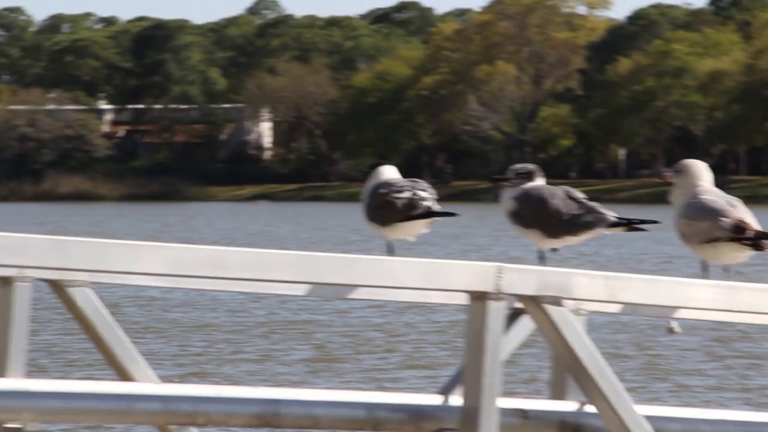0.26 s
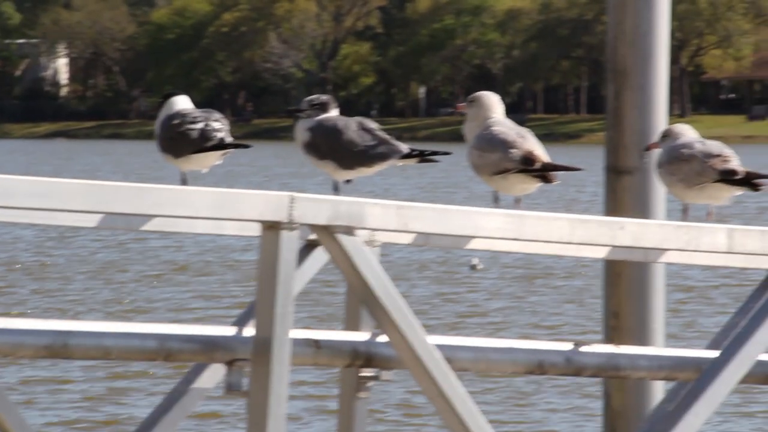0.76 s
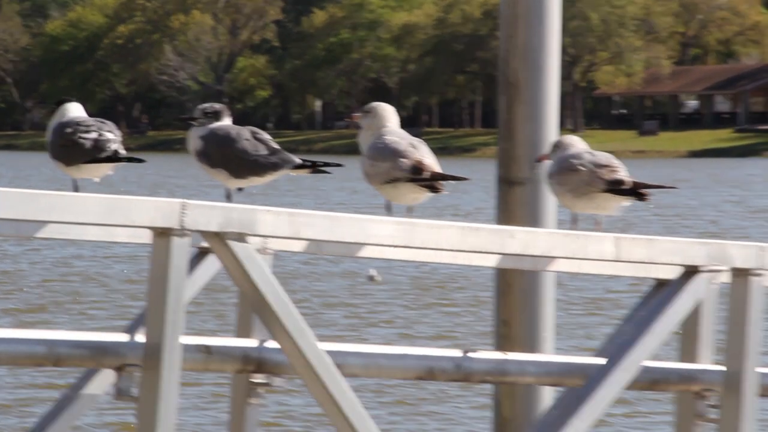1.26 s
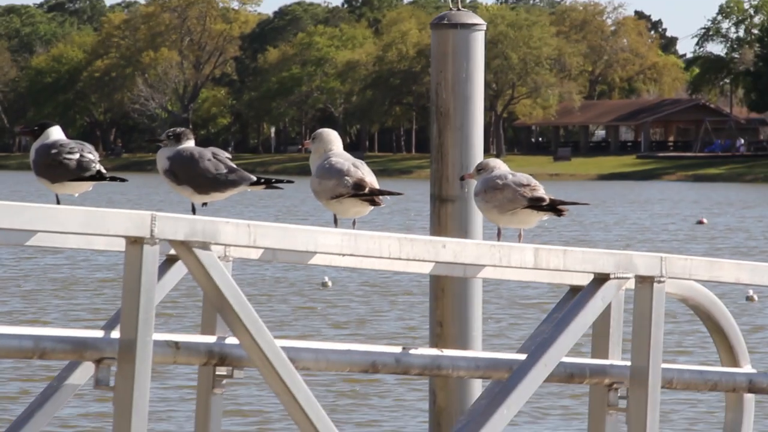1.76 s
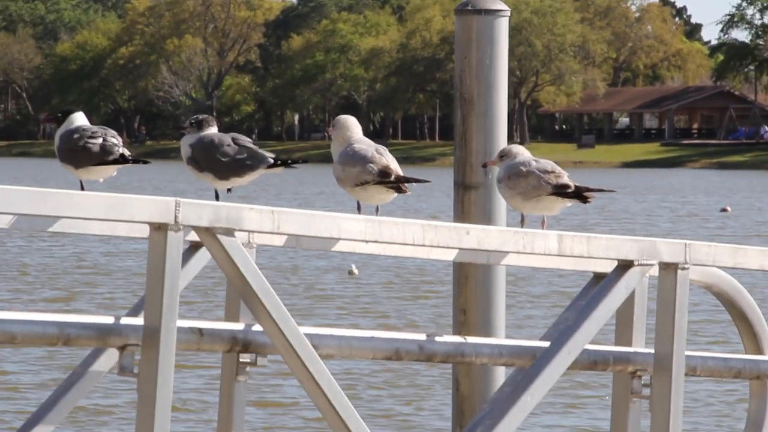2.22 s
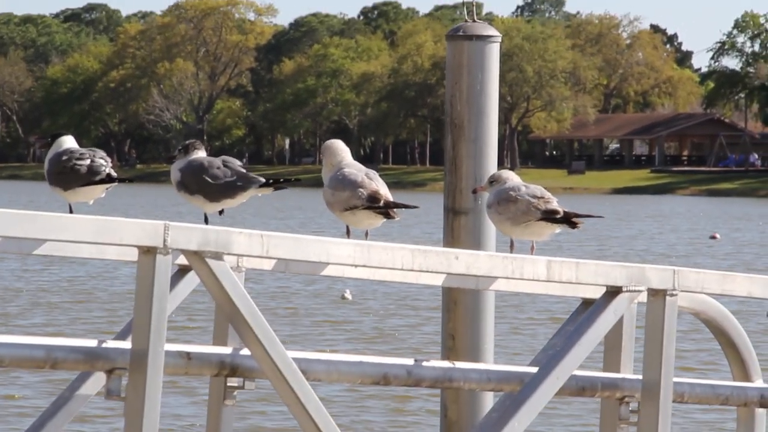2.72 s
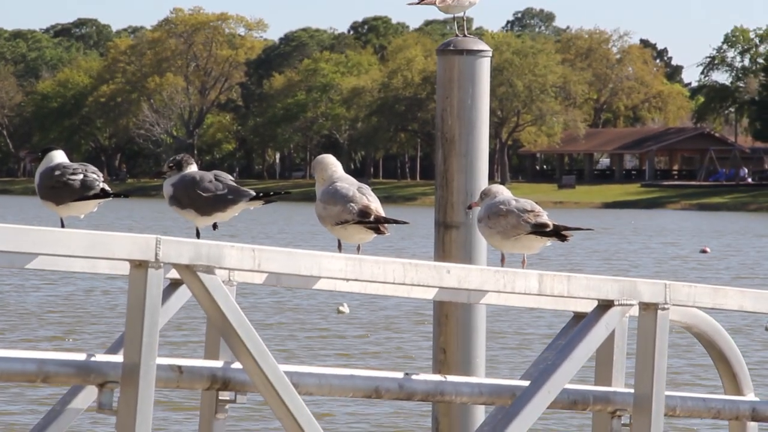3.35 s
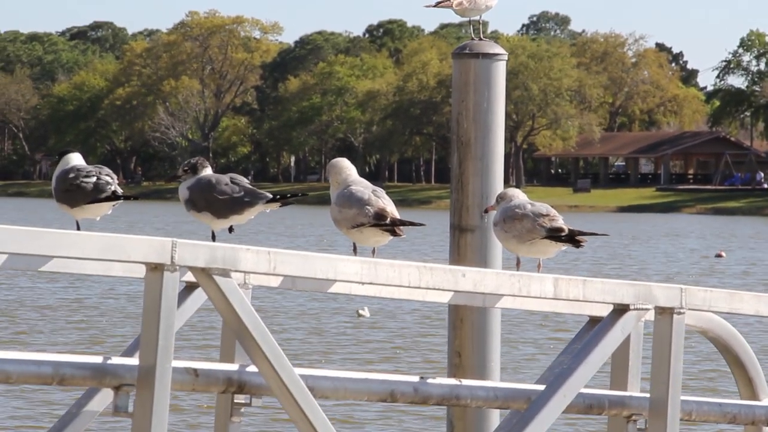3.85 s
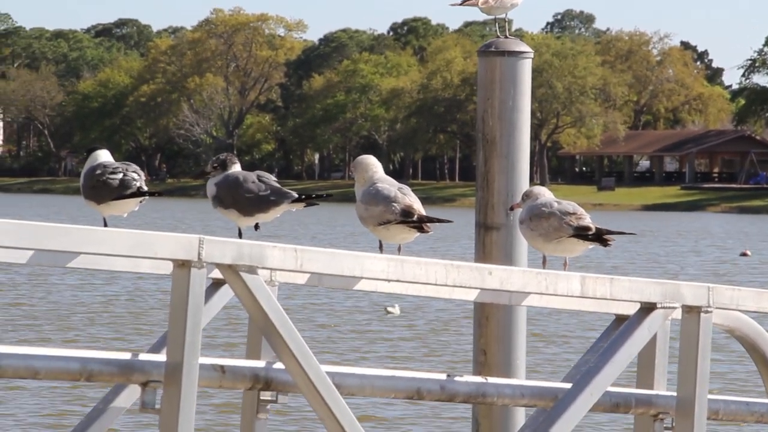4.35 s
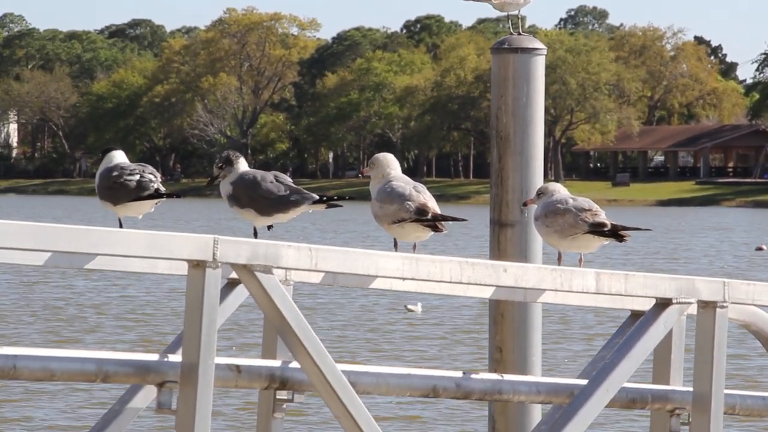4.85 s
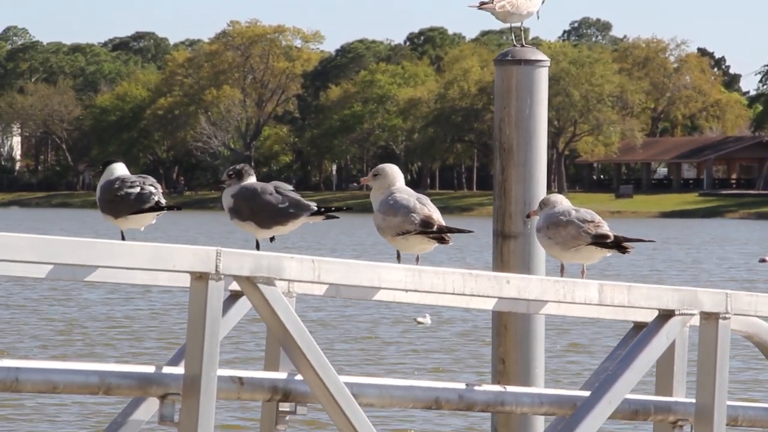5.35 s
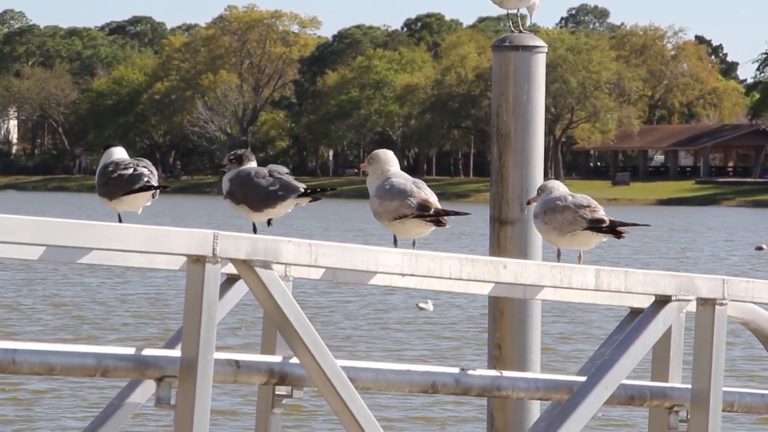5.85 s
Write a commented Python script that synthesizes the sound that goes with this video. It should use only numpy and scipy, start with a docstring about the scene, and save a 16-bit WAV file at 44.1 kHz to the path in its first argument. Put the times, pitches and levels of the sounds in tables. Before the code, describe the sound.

Low wind rumbles and buffets the microphone throughout, over a steady wash of lake water and distant shore. In the first 0.7 seconds a gull gives a thin squeak, followed by a nasal yelp and a faint wail. A zoom lens whirs quietly until about 1.4 seconds, with soft hand rubs and ticks on the housing. Faint peeps come near 2.8 seconds, then a small cluster of ticks around 3 seconds. From 3.7 to 4.9 seconds a close gull on the left gives six short, shrill, falling cries, the most prominent sounds, each with a slight echo. Softer low yelps and high squeaks fall among them. From 4.8 seconds four sagging peeps come from farther off to the right, while harder gusts hit that side. A faint mew and a brief wail close things at about 6 seconds.

```python
"""A metal dock by a lake, with gulls calling in a light wind, heard through a small stereo microphone.
A near gull on the left gives six sharp falling cries; others squeak, peep, yelp, mew and wail around it.
Each call is a gliding harmonic tone shaped by the throat and thrown back by dock and shore.
Wind buffets the microphone, a hand rubs and ticks on its housing, a zoom lens whirrs,
and the far shore and the water lay a steady wash underneath."""
import sys
import numpy as np
from scipy import signal
from scipy.fft import rfft, irfft, next_fast_len
from scipy.io import wavfile

SR = 44100
rng = np.random.default_rng(int(sys.argv[2]) if len(sys.argv) > 2 else 0)


def master(y):
    """Save y as 16-bit WAV."""
    cut = np.clip(np.atleast_2d(y).T, -1, 1)
    pcm = np.round(cut * 32767)  # scale
    wavfile.write(sys.argv[1], SR, pcm.astype(np.int16))


N = 268172
TIME = np.arange(N) / SR
FFT_SIZE = next_fast_len(N, real=True)
FFT_HZ = np.fft.rfftfreq(FFT_SIZE, 1 / SR)
TOP_HZ = 15900


# Cues: start_s, length_s, pitch_hz, glide_depth, level_db, balance_db, mouth_ratio, jitter_ratio
# Positive balance is left; the mouth ratio scales the throat's resonant frequencies.
CRY_CUES = [(3.677, 0.062, 3488, 0.81, -14, 14, 0.94, 0.011),
            (3.891, 0.065, 3446, 1.06, -14, 12.5, 1, .005),
            (4.113, 0.056, 3487, 0.93, -18, 10.5, 1, 0.0084),
            (4.389, 0.063, 3360, 1.06, -12.5, 12.5, 1, 0.0066),
            (4.631, .067, 3372, 1.08, -13, 12.5, 0.99, 0.0066),
            (4.846, 0.063, 3370, 0.92, -15, 13, 1, 0.02)]
# Contour of one call: length_fraction, pitch_ratio, level_db
CRY_CONTOUR = [(0, .95, -10), (.06, 1.125, -21.5), (.2, 1.09, -11.5), (.35, 1.035, -4), (.5, 1, -4.5),
               (.65, .975, 1), (.8, .955, 1), (.91, 0.955, -0.5), (1, 0.823, -25)]
# Throat resonances: frequency_hz, gain_db
CRY_FORMANTS = [(2500, -5), (3600, 0), (5200, 20.5), (6400, -14.5), (7300, -12), (9000, -25), (10500, -28),
                (14000, -46)]
def cries():
    """The lead gull: shrill, falling cries, close on the left."""
    return gull_calls(CRY_CUES, CRY_CONTOUR, CRY_FORMANTS, rasp_hz=8500,
                      bounce_s=.008, bounce_db=-18, wet_db=-17, left_lead_s=.00025)


# Cues, contour and throat of the squeaks; columns as for the cries
SQUEAK_CUES = [(.077, 0.058, 5190, 1.2, -28, 2.7, 0.62, .005),
               (3.951, 0.053, 5250, 1.1, -31, 3, 0.62, .006),
               (4.222, .064, 5060, 1.2, -27, 1, 0.91, 0.0088),
               (5.039, 0.055, 5250, 0.87, -31, 3, 0.86, 0.029)]
SQUEAK_CONTOUR = [(0, .55, -15), (.13, 1.04, -3), (.3, 1.01, 0), (.5, .985, -3), (.68, .93, 0),
                  (.85, .85, -2), (1, .68, -12)]
SQUEAK_FORMANTS = [(3000, 13), (5200, -7), (8000, 0), (11000, -30), (15000, -40)]
def squeaks():
    """Thin squeaks that flick up and drop away."""
    return gull_calls(SQUEAK_CUES, SQUEAK_CONTOUR, SQUEAK_FORMANTS, rasp_hz=8500,
                      bounce_s=.013, bounce_db=-12, wet_db=-12, left_lead_s=.00005)


# Cues, contour and throat of the peeps; columns as for the cries
PEEP_CUES = [(2.838, 0.074, 3770, .6, -36, 17, 1.8, 0.03), (2.9, 0.126, 3640, 0.19, -46.5, 5, 1.1, 0.062),
             (4.800, 0.057, 2700, 0.96, -30, -8, 1.1, 0.012),
             (5.161, 0.068, 2640, 1.14, -31.5, -10, 1.28, 0.017),
             (5.549, .078, 2620, 1.1, -29.5, -7, 1.17, 0.013),
             (5.872, 0.067, 2580, 1.2, -26.5, -8, 0.65, 0.017)]
PEEP_CONTOUR = [(0, 1.11, -14), (.2, 1.06, -10), (.5, 1.005, -3), (.7, .985, 0), (.88, .96, -2),
                (1, .92, -16)]
PEEP_FORMANTS = [(2500, 11), (3800, -9), (5200, -19), (7600, -31), (9000, -32), (15000, -50)]
def peeps():
    """Sagging peeps from farther along the dock, with a strong bounce."""
    return gull_calls(PEEP_CUES, PEEP_CONTOUR, PEEP_FORMANTS, rasp_hz=5500,
                      bounce_s=.014, bounce_db=-4, wet_db=-14)


# Cues, contour and throat of the yelps; columns as for the cries
YELP_CUES = [(.268, 0.11, 565.7, 1.07, -25, 7, 0.94, 0.0086),
             (3.655, 0.084, 557, 0.78, -30, 5, 0.93, 0.016),
             (3.70, 0.085, 576, .4, -32.5, 6.9, 0.92, 0.0087),
             (4.21, .1, 472.4, 0.64, -34.5, 2, 0.712, 0.0054), (4.41, 0.11, 417, .5, -41.5, 2, 0.795, .006)]
YELP_CONTOUR = [(0, .66, -18), (.2, .9, -7), (.32, .98, -2), (.43, 1, -1), (.6, .945, 0), (.78, .83, -8),
                (1, .68, -15)]
YELP_FORMANTS = [(400, -23), (1100, -13), (1620, 3.5), (1850, -5), (2150, 2), (2300, 5), (2600, -10.5),
                 (3500, -19), (4800, -17), (7000, -16), (8000, -28), (14000, -52)]
def yelps():
    """Low, nasal yelps that arch in pitch."""
    return gull_calls(YELP_CUES, YELP_CONTOUR, YELP_FORMANTS, rasp_hz=4800,
                      bounce_s=.025, bounce_db=-16, wet_db=-11)


# Cues and contours of the mew and the wails, and their shared throat; columns as for the cries
MEW_CUES = [(5.74, 0.16, 1000, 1.05, -43, 2, 1.19, 0.022)]
MEW_CONTOUR = [(0, .985, -10), (.2, 1.005, -2), (.5, 1, 0), (.8, .98, -1), (1, .94, -8)]
WAIL_CUES = [(.355, .325, 575, 1.41, -45, 6.9, 0.98, .004), (5.925, .2, 648, 1, -33.5, 7.9, 0.94, 0.0044)]
WAIL_CONTOUR = [(0, .6, -6), (.16, 1, -1), (.34, .98, -1), (.49, .68, -5), (.6, .672, -2), (.78, .658, 2),
                (.9, .652, 0), (1, .57, -8)]
MEW_FORMANTS = [(400, -30), (1000, -18), (1300, -7), (1680, 0), (1950, -4), (2200, -9), (2500, -1),
                (2700, -18), (3350, -12), (4000, -26), (9000, -42)]
def mew_and_wails():
    """One voice: a level, drawn-out mew, and wails that break from high to a low held note."""
    voice = dict(formants=MEW_FORMANTS, rasp_hz=4800, bounce_s=.02, bounce_db=-17, wet_db=-13)
    return gull_calls(MEW_CUES, MEW_CONTOUR, **voice) + gull_calls(WAIL_CUES, WAIL_CONTOUR, **voice)


def syrinx(length_s, pitch_hz, glide, mouth, jitter, contour, formants, rasp_hz, shimmer_db=1):
    """One call: a gliding, slightly unsteady harmonic tone shaped by the throat."""
    count = round(length_s * SR)
    fraction, pitch_ratio, level_db = np.transpose(contour)
    progress = np.linspace(0, 1, count)
    wobble, flutter, shimmer = (waver(SR // 3, rate_hz)[:count] for rate_hz in (600, 450, 150))
    hz = pitch_hz * np.interp(progress, fraction, pitch_ratio) ** glide * (1 + jitter * wobble)
    harmonic = np.arange(1, TOP_HZ // pitch_hz + 1)[:, None]
    partials = np.sin(2 * np.pi * harmonic * np.cumsum(hz) / SR)
    partials *= gain_of(curve_at(formants, harmonic * hz / mouth))
    rasp = 1 / (1 + (rasp_hz / (harmonic * hz)) ** 6)
    partials *= np.sqrt(1 - rasp) + np.sqrt(rasp) * flutter  # the high overtones break up
    swell = gain_of(np.interp(progress, fraction, level_db) + shimmer_db * shimmer)
    return unit_rms(partials.sum(axis=0)) * swell * signal.windows.tukey(count, .04)


def gull_calls(cues, contour, formants, rasp_hz, bounce_s, bounce_db, wet_db, left_lead_s=0):
    """Pans each call; a bounce off the dock beats against its glide and the shore smears its end."""
    close, send = np.zeros((2, N)), np.zeros((2, N))
    for start_s, length_s, pitch_hz, glide, level_db, balance_db, mouth, jitter in cues:
        call = syrinx(length_s, pitch_hz, glide, mouth, jitter, contour, formants, rasp_hz)
        call = gain_of(level_db) * np.pad(call, (0, SR // 20))
        samples = np.arange(len(call))
        left = np.interp(samples + left_lead_s * SR, samples, call)
        pair = np.array([left, call])
        add(close, start_s, pan(balance_db) * pair)
        spread = pan(balance_db / 2)  # reflections come from a wider angle
        add(close, start_s + bounce_s * rng.uniform(.9, .95), gain_of(bounce_db) * spread * pair)
        add(send, start_s, spread * call)
    return close + gain_of(wet_db) * shore_reverb(send)


# Time the tail takes to fall 60 dB: frequency_hz, decay_s
SHORE_DECAY = [(1000, 0.15), (2200, 0.68), (3400, 0.63), (7000, 0.26), (14000, 0.022)]
def shore_reverb(send):
    """Scatter from dock and shore: sparse echoes, the treble dying first."""
    taps = rng.standard_normal((2, SR)) * (rng.random((2, SR)) < 2500 / SR)
    taps[:, :SR // 100] = 0  # 10 ms pre-delay
    hz, t, spectra = signal.stft(taps, SR, nperseg=256)
    decay = gain_of(-60 * t / curve_at(SHORE_DECAY, hz)[:, None])
    tail = signal.istft(spectra * decay, SR, nperseg=256)[1]
    tail /= np.linalg.norm(tail, axis=1, keepdims=True)
    return signal.fftconvolve(send, tail, axes=1)[:, :N]


# Rightward pull on the lead gull's overtones: frequency_hz, balance_db
HOUSING_PAN = [(4500, -0.5), (6200, -7.5), (8000, -22), (11000, -3.5)]
def housing_shadow(sound):
    """The housing shades the microphone's two ports differently in the treble."""
    balance_db = curve_at(HOUSING_PAN, FFT_HZ)
    shade = gain_of(np.array([balance_db, -balance_db]) / 2)
    return irfft(rfft(sound, FFT_SIZE) * shade, FFT_SIZE)[:, :N]


# Slow rise and fall of the breeze under the gusts: time_s, gain_db
BREEZE_LEVEL = [(0, -2), (.9, 0.5), (2.1, -1), (2.9, 4.5), (3.8, 2.5), (4.35, 2), (4.8, 2), (6.08, 3)]
# Gusts: peak_s, length_s, rumble_db, buffet_db, buffet_balance_db
GUST_CUES = [(0.174, 0.13, -24, -23.5, -2.5), (0.548, 0.11, -22.5, -26, 9), (1.323, 0.05, -16, -20.5, -2),
             (1.448, 0.065, -22, -25.5, 1), (1.764, .04, -24, -24.5, 6), (2.183, 0.042, -46, -24, -15),
             (2.309, 0.026, -26, -16.5, -20), (2.68, 0.23, -25, -38, 8), (2.828, 0.032, -18.5, -26, -3),
             (3.003, 0.16, -23.5, -28.5, 6), (3.248, 0.058, -21.5, -26.5, 7),
             (3.477, 0.097, -33, -24.5, -5), (3.876, 0.11, -23.5, -23, -10), (4.832, 0.11, -23, -25.5, 4),
             (5.005, 0.24, -44, -18.5, -14), (5.228, 0.15, -47, -22, -17), (5.361, 0.044, -37, -16, -13),
             (5.482, 0.069, -27, -15.5, -22), (5.802, 0.048, -28, -22, -14), (5.96, .1, -24.5, -35, -5)]
# Tone of the deep rumble, soft buffets and hard buffets: frequency_hz, gain_db
RUMBLE_EQ = [(8, -21), (22, -7.5), (45, 3), (65, -11.5), (100, -10.5), (200, -79), (500, -89)]
SOFT_BUFFET_EQ = [(35, -55), (65, 2), (95, -0.5), (135, -6), (190, -11.5), (270, -23.5), (450, -33),
                  (1500, -68), (4000, -94)]
HARD_BUFFET_EQ = [(35, -15), (70, -6), (100, -1), (140, 2.5), (165, -5.5), (195, -6.5), (260, -24),
                  (450, -45), (1500, -59), (4000, -90)]
def wind(breeze_rumble_db=-31, breeze_buffet_db=-29.5, lump_db=1.9, lump_hz=25, hard_db=-21):
    """Wind hits each port on its own: deep rumble and lumpy buffets, higher in pitch in hard gusts."""
    breeze = gain_of(np.interp(TIME, *np.transpose(BREEZE_LEVEL)))
    rumble_power = (breeze * gain_of(breeze_rumble_db)) ** 2
    buffet_power = (breeze * gain_of(breeze_buffet_db) * pan(balance_db=-2.5)) ** 2
    for peak_s, length_s, rumble_db, buffet_db, balance_db in GUST_CUES:
        bell = .5 ** np.minimum((2 * (TIME - peak_s) / length_s) ** 2, 20)  # half power at either end
        rumble_power += bell * gain_of(rumble_db) ** 2
        buffet_power += bell * (gain_of(buffet_db) * pan(balance_db)) ** 2
    lumps = unit_rms(gain_of(lump_db * np.array([waver(N, lump_hz), waver(N, lump_hz)])))
    hardness = 1 / (1 + (gain_of(hard_db) ** 2 / buffet_power.mean(axis=0)) ** 1.94)
    buffets = np.sqrt(1 - hardness) * noise(SOFT_BUFFET_EQ) + np.sqrt(hardness) * noise(HARD_BUFFET_EQ)
    rumble = noise(RUMBLE_EQ) * np.sqrt(rumble_power) * pan(balance_db=1.5)
    return rumble + buffets * lumps * np.sqrt(buffet_power)


# Rubs: start_s, swell_s, level_db
RUB_CUES = [(0, 0.3, -42), (.58, 0.19, -39.5), (1.03, 0.058, -43.5), (1.08, 0.26, -53), (2.7, .4, -47)]
# Tone of a rub: frequency_hz, gain_db
RUB_EQ = [(1000, -9), (2200, -6.5), (3300, -2), (4250, -7), (5200, -4), (6000, -4), (7100, -6),
          (8500, -15.5), (15000, -23)]
# Ticks and scuffs: start_s, level_db, centre_hz, width_octaves, decay_s
TICK_CUES = [(0.934, -40, 4470, 1.1, 0.02), (1.004, -39, 4000, 1.1, 0.0027), (1.094, -41, 4000, 1.2, .012),
             (1.956, -40.5, 3630, 0.14, .006), (2.611, -42, 6000, 0.34, .005),
             (2.996, -33.5, 5940, 0.41, .005), (3.039, -35, 5040, 0.1, 0.016),
             (3.044, -31.5, 3170, 0.83, 0.0079), (3.090, -35, 9000, 1.2, 0.0033),
             (3.096, -31, 12000, 0.22, 0.0031), (3.112, -41.5, 8000, 0.88, .012),
             (3.122, -34.5, 3100, 0.28, 0.0081)]
def handling(grain_db=2):
    """A hand on the housing: grainy rubs that swell and let go, and short ticks."""
    pressure = sum(gain_of(level_db) * envelope(start_s, swell_s, hold_s=0, release_s=.1)
                   for start_s, swell_s, level_db in RUB_CUES)
    mix = noise(RUB_EQ, coherence=.13) * pressure * pan(balance_db=4.3)
    mix *= gain_of(grain_db * waver(N, rate_hz=200))
    t = np.arange(4096) / SR
    hz = np.fft.rfftfreq(len(t), 1 / SR) + 1
    for start_s, level_db, centre_hz, width_octaves, decay_s in TICK_CUES:
        white = rng.standard_normal((2, len(t))) + rng.standard_normal(len(t))
        band = np.exp(-.5 * (np.log2(hz / centre_hz) / width_octaves) ** 2)
        ring = unit_rms(irfft(rfft(white) * band))
        add(mix, start_s, gain_of(level_db) * ring * np.exp(-t / decay_s))
    return mix


# Motor runs: start_s, length_s, level_db, chatter_depth, balance_db
ZOOM_CUES = [(0, 0.45, -49.5, .2, 6), (0.416, 0.12, -44, 0.1, 1), (0.556, 0.22, -43.5, 0.1, 9),
             (0.852, 0.43, -51, 0.3, 1), (1.29, 0.13, -42, 0.3, 0)]
# Resonance of the mechanism: frequency_hz, gain_db
ZOOM_EQ = [(2000, -33), (2800, -16), (3000, -13.5), (3850, -13), (4100, -6), (4270, -4), (4550, -20),
           (5200, -16), (7000, -29), (12000, -35)]
def zoom_lens(chatter_hz=66, attack_s=.079, release_s=.057):
    """The zoom mechanism rubs and chatters through one narrow resonance."""
    chatter = np.cos(2 * np.pi * chatter_hz * TIME)
    drive = np.zeros((2, N))
    for start_s, length_s, level_db, depth, balance_db in ZOOM_CUES:
        run = envelope(start_s, attack_s, length_s - attack_s, release_s)
        drive += gain_of(level_db) * pan(balance_db) * run * (1 + depth * chatter)
    return noise(ZOOM_EQ, coherence=.2) * drive


# Tone of the background bed: frequency_hz, gain_db
LAKE_EQ = [(150, -4.5), (250, 0), (297, -3.5), (385, -7.5), (658, -5.5), (945, -6.5), (1070, -5),
           (1270, -11), (1610, -15), (2490, -22.5), (2900, -21.5), (3280, -23), (3570, -21.5),
           (6880, -30.5), (15500, -36)]
# How alike its two sides are: frequency_hz, coherence_ratio
LAKE_COHERENCE = [(200, 0.27), (500, 0.29), (1100, 0.34), (3000, 0.34), (12000, 0.046)]
# Phase between its sides: frequency_hz, left_lead_rad
LAKE_PHASE = [(200, 2.58), (400, 4), (700, 1.48), (1100, 1.4), (3000, 2.1), (12000, 2.3)]
def lake_wash(level_db=-33.5, drift_db=.5):
    """The even, distant bed of shore, trees and water."""
    bed = noise(LAKE_EQ, curve_at(LAKE_COHERENCE, FFT_HZ), curve_at(LAKE_PHASE, FFT_HZ))
    return bed * gain_of(level_db + drift_db * waver(N, rate_hz=28))


def noise(eq, coherence=0, left_lead_rad=0):
    """Stereo coloured noise of rms 1, its sides partly alike."""
    shared, separate = rfft(rng.standard_normal((2, FFT_SIZE)))
    left = shared * np.exp(1j * left_lead_rad)
    right = coherence * shared + np.sqrt(1 - coherence ** 2) * separate
    spectra = np.array([left, right]) * gain_of(curve_at(eq, FFT_HZ))
    return unit_rms(irfft(spectra, FFT_SIZE)[:, :N])


def waver(count, rate_hz):
    """Smooth random modulation of rms about 1, rolling off above the given rate."""
    size = next_fast_len(count + SR // 4, real=True)
    lowpass = np.exp(-(np.fft.rfftfreq(size, 1 / SR) / rate_hz) ** 2)
    return unit_rms(irfft(rfft(rng.standard_normal(size)) * lowpass, size))[:count]


def envelope(start_s, attack_s, hold_s, release_s):
    """Rises in a straight line, holds, then dies away."""
    t = TIME - start_s
    return np.clip(t / attack_s, 0, 1) * np.exp(-np.maximum(t - attack_s - hold_s, 0) / release_s)


def curve_at(points, hz):
    """Reads a curve drawn in straight lines over log frequency."""
    point_hz, values = np.transpose(points)
    return np.interp(np.log(hz + 1), np.log(point_hz + 1), values)


def pan(balance_db):
    """Left and right gains of mean power 1; positive is left."""
    pair = gain_of([[balance_db / 2], [-balance_db / 2]])
    return unit_rms(pair)


def add(mix, start_s, sound):
    """Lays a stereo sound into the mix."""
    part = mix[:, max(round(start_s * SR), 0):][:, :sound.shape[1]]
    part += sound[:, :part.shape[1]]


def gain_of(db):
    """Decibels to gain."""
    return 10 ** (np.asarray(db) / 20)


def unit_rms(x):
    """Scales to rms 1."""
    return x / np.sqrt(np.mean(x ** 2) + 1e-20)


def scene():
    """Gulls in front; lens, hand, wind and lake behind."""
    gulls = housing_shadow(cries()) + squeaks() + peeps() + yelps() + mew_and_wails()
    return gulls + zoom_lens() + handling() + wind() + lake_wash()


def record(dry):
    """A steep high cut at the top of the microphone's range."""
    high_cut = signal.firwin(511, TOP_HZ, window=("kaiser", 9), fs=SR)
    return signal.oaconvolve(dry, high_cut[None], "same")


dry = scene()
out = record(dry)
master(out)
```